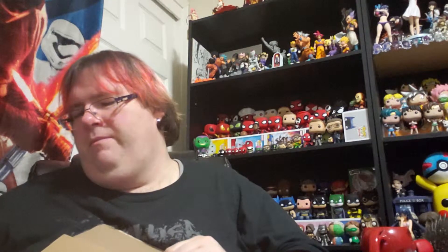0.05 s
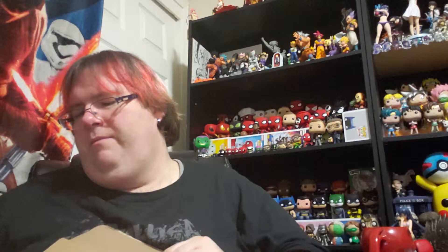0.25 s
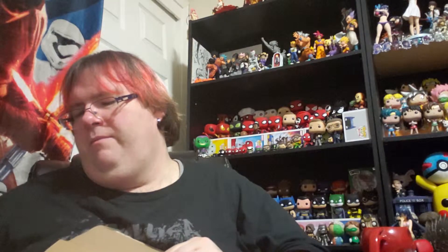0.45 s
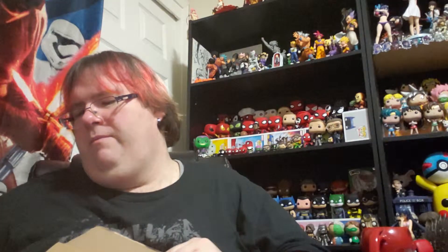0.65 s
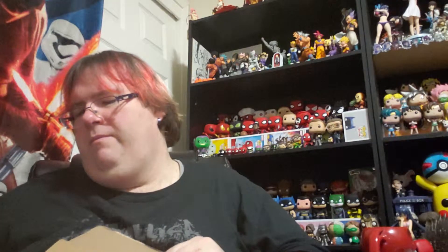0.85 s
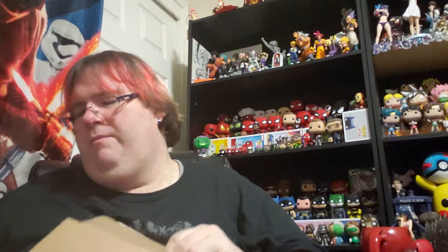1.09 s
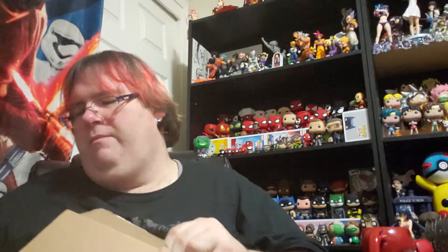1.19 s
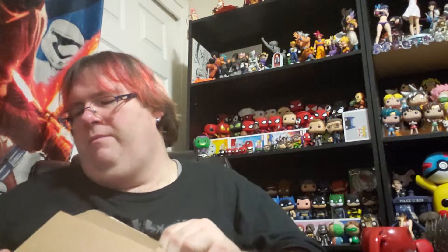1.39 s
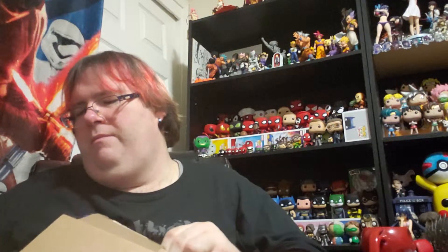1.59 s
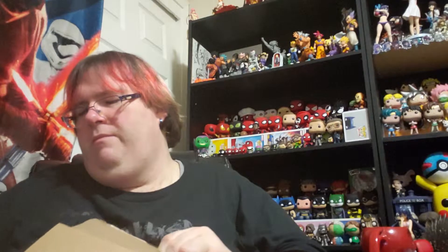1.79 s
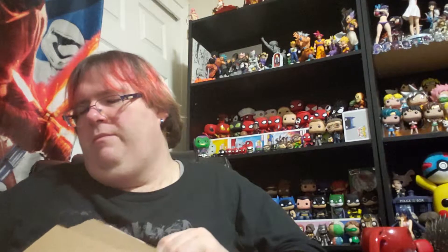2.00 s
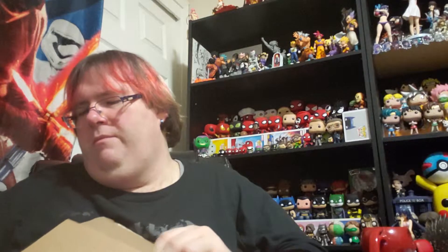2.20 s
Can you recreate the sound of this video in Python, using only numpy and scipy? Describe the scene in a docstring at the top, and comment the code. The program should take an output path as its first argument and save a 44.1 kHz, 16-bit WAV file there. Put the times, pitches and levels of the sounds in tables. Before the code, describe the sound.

Packing tape rips off a cardboard box in two quick, crackling pulls. The flaps slide and knock softly, then a last short tug brings a sharp knock and small tape snaps, close to the microphone in a small room.

```python
"""Packing tape ripped off a cardboard box, close to a stereo microphone in a small room.
After a few knocks and a slide come two quick pulls: the glue lets go in a stutter of slips
that crackle in the film and drum on the box. From one second in, the flaps slide and knock.
A last short tug at 1.6 s brings the hardest knock; then loose tape snaps among more slides
and knocks. A faint rumble and hum lie under it all."""
import sys
import numpy as np
from scipy import signal
from scipy.fft import rfft, irfft
from scipy.io import wavfile
from scipy.ndimage import uniform_filter1d

SR = 44100
rng = np.random.default_rng(int(sys.argv[2]) if len(sys.argv) > 2 else 0)


def int16_out(signal):
    """Quantize to a 16-bit WAV file."""
    q = np.round(np.clip(np.atleast_2d(signal).T, -1, 1) * 32767)
    wavfile.write(sys.argv[1], SR, q.astype(np.int16))


N = 99225

# Tugs on the tape. Each row: start and length in seconds, then crackle, fizz and box levels in dB.
TUGS = [(0.197, 0.016, -47, -57, -58), (0.219, 0.03, -35, -49.5, -41.5),
        (0.247, 0.017, -34.5, -54.5, -35.5), (0.266, 0.034, -30, -46, -40), (0.299, 0.016, -22, -33, -37),
        (0.321, 0.0075, -23.5, -50, -41), (0.349, 0.051, -53, -63, -53.5), (0.371, 0.0097, -27, -38.5, -37),
        (0.529, 0.1, -40, -48.5, -54.5), (.562, 0.012, -30, -35.5, -41), (0.582, 0.0095, -26, -38, -44.5),
        (0.603, 0.0037, -28.5, -33.5, -35), (0.608, 0.031, -27, -38.5, -40),
        (0.667, 0.0051, -27.5, -37.5, -36.5), (0.685, 0.0048, -23.5, -36, -47.5),
        (0.699, 0.0092, -28.5, -38.5, -40), (1.613, 0.015, -56, -42.5, -44),
        (1.627, 0.015, -38.5, -39, -45), (1.641, 0.0071, -34, -47.5, -41.5)]
# The glue lets go all at once. Each row: time in seconds, crack level in dB, box level in dB.
HARD_SLIPS = [(.236, -39, -16), (.307, -35, -17), (0.3126, -20, -13), (.377, -24.5, -20.5),
              (.590, -25, -12.5), (.609, -19.5, -18.5), (.629, -26, -11.5), (0.638, -17, -16.5),
              (.667, -37.5, -10), (.690, -19, -12.5), (.7005, -45, -12), (.7085, -24, -19.5)]
# Tone of the film's crackle and fizz, heard close. Each row: frequency in Hz, gain in dB.
CRACKLE_TONE = [(100, -26.5), (500, -12.5), (1000, -3.5), (1300, -4), (1800, 2), (2500, -2), (3800, -7),
                (5800, -12), (7500, -13), (10000, -17.5), (16000, -32.5)]
FIZZ_TONE = [(200, -1), (2000, -13.5), (5000, -10), (7500, 0.5), (11000, 3), (13000, -2.5), (16000, 0)]
SLIP_HZ, SLIP_JITTER, SLIP_DECAY_S = 200.3, 0.3, 0.0024
THREADS_PER_S, STEADY_PEEL = 16000, 0.45


def tape_peel():
    """Each slip jerks the box and snaps a burst of glue threads. Returns film sound and box force."""
    gaps = np.exp(SLIP_JITTER * rng.standard_normal(1200)) / SLIP_HZ
    slips = impulses(np.cumsum(gaps), np.ones(len(gaps)))
    bursts = STEADY_PEEL + fade(slips, SLIP_DECAY_S)
    coarse, fine = (even(bursts * grains(THREADS_PER_S, scatter_db=2), 0.036) for _ in range(2))
    levels = np.zeros((3, N))
    for start, length, *dbs in TUGS:
        rise = 0.22 * length
        levels += np.outer(undb(dbs), envelope(start - rise / 2, rise, length + rise / 2, 0.0019))
    crackle, fizz, push = levels
    times, crack_db, jerk_db = np.array(HARD_SLIPS).T
    cracks = fade(impulses(times, undb(crack_db)), SLIP_DECAY_S) * rng.choice([-1, 1], N)
    force = push * even(0.81 * unit(slips) + coarse, 0.0025) + impulses(times, undb(jerk_db))
    film, force = tension(crackle * coarse + cracks, force)
    return colour(film, CRACKLE_TONE) + colour(fizz * fine, FIZZ_TONE), force


# Resonances under tension. Each row: start in seconds, the film's pitch in Hz and level in dB,
# the box hollow's pitch in Hz and level in dB.
PULL_RESONANCES = [(.15, 2040, -24, 840, -9.5), (.5, 6000, -1, 650, -5), (.66, 5920, 1, 630, -4),
                   (1.55, 2030, 1, 496, -13)]
FILM_Q, HOLLOW_Q = 4.7, 4.9


def tension(film, force):
    """Tension makes the film and the hollow of the box ring at new pitches from pull to pull."""
    pull = np.searchsorted([row[0] for row in PULL_RESONANCES], np.arange(N) / SR) - 1
    film_ring, hollow_ring = np.zeros((2, N))
    for k, (_, film_hz, film_db, hollow_hz, hollow_db) in enumerate(PULL_RESONANCES):
        film_ring += undb(film_db) * resonate(film * (pull == k), film_hz, FILM_Q)
        hollow_ring += undb(hollow_db) * resonate(force * (pull == k), hollow_hz, HOLLOW_Q)
    return film + film_ring, force + hollow_ring


# Loose tape snapping near the microphone. Each row: time in seconds, relative level in dB.
SNAPS = [(.144, -40), (.378, -25), (.609, -10), (1.007, -51.5), (1.141, -44), (1.623, -20), (1.6455, -18),
         (1.648, -12), (1.8523, -25.5), (1.8593, -20), (1.8684, -20.5), (1.9467, -16.5)]
# Tone of a snap. Each row: frequency in Hz, gain in dB.
SNAP_TONE = [(200, -31), (4000, -26), (6000, -21), (8000, -18.5), (11200, -5), (13000, -7.5), (16000, -7)]


def tape_snaps():
    """Each snap is a brief crumple of film, thin and bright."""
    crumple = 0.51 * fade(hits(SNAPS), decay_s=0.00083) * rng.choice([-1, 1], N)
    return colour(crumple, SNAP_TONE)


# Hand and flap knocking on the box. Each row: time in seconds, level in dB.
KNOCKS = [(.019, -56), (.063, -36.5), (.136, -35), (.185, -32), (1.006, -31), (1.392, -46), (1.429, -45.5),
          (1.6135, -30), (1.6185, -20.5), (1.6235, -13.5), (1.824, -28), (1.8445, -22)]
# Tone of the damped cardboard. Each row: frequency in Hz, gain in dB.
BOARD_TONE = [(40, -47), (120, -4), (220, -1), (400, 9.5), (640, 13), (820, 10.5), (1200, -4), (2500, -9.5),
              (6000, -37.5), (16000, -43)]
# Modes of the box. Each row: frequency in Hz, relative level in dB, seconds to die away by 60 dB.
BOX_MODES = [(166.4, -3.5, 0.24), (265.5, 1, 0.13), (365.2, 0.5, 0.17), (501.6, 1, 0.2), (608.6, -1, 0.22),
             (677, -0.5, 0.17), (729.5, 0, 0.19), (752, -1.5, 0.13), (1615, -2.5, 0.1), (1765, -4, 0.14),
             (2044, -6, 0.12), (2460, -3.5, 0.25), (2590, 1.5, .1)]
RING_DB, BOX_LAG_S = -40.5, 0.00015


def box(rubbing):
    """Tugs, slides and knocks thud in the board; panels and hollow ring on, reaching the left first."""
    force = rubbing + hits(KNOCKS)
    t = np.arange(SR // 2) / SR
    ringing = []
    for lag in (0, BOX_LAG_S):
        modes = sum(undb(db) * np.sin(2 * np.pi * hz * (t - lag)) * np.exp(-np.log(1000) * t / t60)
                    for hz, db, t60 in BOX_MODES)
        ringing.append(ring(force, modes * (t >= lag)))
    thud = room(colour(force, BOARD_TONE), direct_db=2, lag_s=BOX_LAG_S)
    return thud + undb(RING_DB) * np.array(ringing)


# Cardboard sliding on cardboard. Each row: start, rise and length in seconds,
# then scrape, fizz and box levels in dB, then rasp pitch in Hz.
SLIDES = [(-.01, 0.02, 0.017, -69.5, -70.5, -61, 6800), (0.112, 0.085, 0.13, -66.5, -64.5, -61.5, 5950),
          (0.999, 0.0068, 0.028, -59.5, -91, -65, 3330), (1.031, 0.12, 0.23, -66, -69.5, -77.5, 1600),
          (1.239, 0.041, 0.096, -66.5, -70.5, -69.5, 1530), (1.339, 0.0067, 0.15, -73.5, -74.5, -81, 1620),
          (1.74, 0.019, 0.14, -68.5, -73.5, -72.5, 1660), (1.814, 0.024, 0.063, -57, -53, -70.5, 2590),
          (1.907, 0.038, 0.08, -62, -97, -66.5, 2600), (2.023, 0.0067, 0.045, -69, -66, -68.5, 5450),
          (2.187, 0.0017, 0.081, -57.5, -60, -67.5, 5240)]
# Tone of the scrape. Each row: frequency in Hz, gain in dB.
SCRAPE_TONE = [(100, 10.5), (800, -14), (1200, -15), (1650, -1), (2200, -5), (2700, -2.5), (3700, -16),
               (5000, -4.5), (7000, -3), (16000, -20)]
RASP_DB, RASP_Q = 4.5, 5


def flap_slides():
    """Paper fibres catch as a flap slides, rasping at one pitch. Returns surface sound and box force."""
    coarse, fine, drag = (even(grains(per_s=12000, scatter_db=0.78), 0.06) for _ in range(3))
    scrape, fizz = colour(coarse, SCRAPE_TONE), colour(fine, FIZZ_TONE)
    surface, force = np.zeros((2, N))
    for start, rise, length, scrape_db, fizz_db, box_db, rasp_hz in SLIDES:
        stroke = envelope(start, rise, length, release_s=0.017)
        rasp = undb(RASP_DB) * resonate(drag, rasp_hz, RASP_Q)
        surface += stroke * (undb(scrape_db) * (scrape + rasp) + undb(fizz_db) * fizz)
        force += stroke * undb(box_db) * drag
    return surface, force


# The box shifting. Each row: time in seconds, level in dB.
BUMPS = [(.32, -48), (.675, -52), (0.716, -53), (1.43, -61), (1.853, -53)]
# Tone of a dull bump. Each row: frequency in Hz, gain in dB.
BUMP_TONE = [(15, -67), (30, -35), (48, 18), (70, -8), (90, 8), (140, -34), (400, -55.5), (2000, -70)]
BUMP_WIDTH_S = 0.021


def box_bumps():
    """The whole box moves, giving short low swells."""
    t = np.arange(N) / SR
    swell = sum(undb(db) * np.exp(-0.5 * ((t - time) / BUMP_WIDTH_S) ** 2) for time, db in BUMPS)
    return swell * even(colour(rng.standard_normal(N), BUMP_TONE), 0.03)


BASS_T60_S, BASS_DB, TREBLE_T60_S, TREBLE_DB = 0.11, -1.5, 0.2, -0.5
WALL_DELAY_S, CROSSOVER_HZ, WANDER_HZ = 0.0034, 648, 4


def room(x, direct_db, lag_s=0.00004):
    """Direct sound, left side first, then the near walls' echoes, which shift as the hands move."""
    t = np.arange(SR // 2) / SR
    turn = 2 * np.pi * WANDER_HZ * np.arange(N) / SR

    def tail(t60, band):
        shape = np.clip(t / WALL_DELAY_S, 0, 1) ** 2 * np.exp(-np.log(1000) * t / t60)
        echoes = sum(ring(x * place, rng.standard_normal(len(t)) * shape)
                     for place in (np.cos(turn), np.sin(turn)))
        crossover = signal.butter(2, CROSSOVER_HZ, band, fs=SR, output="sos")
        return signal.sosfilt(crossover, echoes) / np.sqrt(np.sum(shape ** 2))
    direct = np.array([np.pad(x, (round(lag * SR), 0))[:N] for lag in (0, lag_s)])
    bass = tail(BASS_T60_S, "low")  # the same on both sides
    treble = np.array([tail(TREBLE_T60_S, "high") for _ in range(2)])
    return undb(direct_db) * direct + undb(BASS_DB) * bass + undb(TREBLE_DB) * treble


# Rumble of the room. Each row: frequency in Hz, gain in dB.
RUMBLE_TONE = [(15, -31), (30, -35), (55, 8.5), (110, 0.5), (200, -6.5), (400, -14), (800, -19.5),
               (2000, -31.5), (8000, -41)]
RUMBLE_DB, HUM_DB, HUM_HZ, HUM_WAVER_HZ = -70, -77, 165.4, 2


def room_tone():
    """A low rumble, nearly centred, and a faint wavering hum."""
    t = np.arange(N) / SR
    mid, side, waver = (unit(colour(rng.standard_normal(N), tone))
                        for tone in (RUMBLE_TONE, RUMBLE_TONE, BUMP_TONE))
    rumble = mid + 0.29 * side * np.array([[1], [-1]])
    hum = np.sqrt(2) * np.sin(2 * np.pi * (HUM_HZ * t + HUM_WAVER_HZ * np.cumsum(waver) / SR))
    return undb(RUMBLE_DB) * rumble + undb(HUM_DB) * hum


def undb(db):
    """Decibels to gain."""
    return 10 ** (np.asarray(db) / 20)


def unit(x):
    """Scale to rms 1."""
    return x / np.sqrt(np.mean(x ** 2))


def ring(x, response):
    """Play x through an impulse response."""
    return signal.fftconvolve(x, response)[:N]


def resonate(x, hz, q):
    """Play x through one resonance."""
    return signal.lfilter(*signal.iirpeak(hz, q, fs=SR), x)


def colour(x, points, column=1, size=4096):
    """Minimum-phase filter through (Hz, dB) points."""
    points = np.array(points, float)
    hz = np.maximum(np.fft.rfftfreq(size, 1 / SR), 1)
    gain = undb(np.interp(np.log(hz), np.log(points[:, 0]), points[:, column]))
    cepstrum = irfft(np.log(gain))
    cepstrum[1:size // 2] *= 2
    cepstrum[size // 2 + 1:] = 0
    return ring(x, irfft(np.exp(rfft(cepstrum))))


def impulses(times, sizes):
    """One click at each time."""
    out, at = np.zeros(N), np.round(np.asarray(times) * SR).astype(int)
    inside = (at >= 0) & (at < N)
    np.add.at(out, at[inside], np.asarray(sizes)[inside])
    return out


def hits(table):
    """Clicks from (s, dB) rows."""
    times, dbs = np.array(table).T
    return impulses(times, undb(dbs))


def envelope(start, rise, length, release_s):
    """Rise, hold until the length is over, die away."""
    t = np.arange(N) / SR - start
    return np.clip(t / rise, 0, 1) * np.exp(-np.maximum(t - length, 0) / release_s)


def fade(clicks, decay_s):
    """Give each click a dying tail."""
    return signal.lfilter([1], [1, -np.exp(-1 / (decay_s * SR))], clicks)


def even(x, span_s):
    """Hold the short-term rms near 1, keeping the grain."""
    span = max(int(span_s * SR), 2)
    return x / np.sqrt(uniform_filter1d(uniform_filter1d(x ** 2, span), span) + 1e-9)


def grains(per_s, scatter_db):
    """Dense tiny clicks of uneven size."""
    clicks = (rng.random(N) < per_s / SR) * rng.choice([-1, 1], N)
    return clicks * undb(scatter_db * rng.standard_normal(N))


def scene():
    """Tape and flaps drive the one box, close to the microphone in the small room."""
    film, pull = tape_peel()
    surface, drag = flap_slides()
    return (room(film + surface, direct_db=-2) + room(tape_snaps(), direct_db=5.5)
            + box(pull + drag) + box_bumps() + room_tone())


# The stereo microphone's two ports. Each row: frequency in Hz, left and right gain in dB,
# left and right relative hiss in dB.
MIC_PORTS = [(103, 1.5, -4.5, -19.5, -16), (298.5, 6.5, 2, -15, -13), (578, 0.5, -2, -8.5, -11),
             (990, 6, 0.5, -11.5, -19), (2500, 3.5, -7, -14.5, -17.5), (4760, 6.5, 1, -15.5, -20.5),
             (6070, 10.5, -5, -9, -34), (7530, 1, -1.5, 3, -23), (8180, -2.5, -11.5, -13, -25),
             (10250, -12, 8, -25, -21.5), (11660, -9.5, 11, -12, -6), (12400, -15.5, 8.5, -25, -9.5),
             (15800, -11.5, 3, -12, -23)]
HISS_DB, LOW_CUT_HZ, HIGH_CUT_HZ = -58, 68, 15850


def record(dry):
    """Each microphone port has its own resonances and hiss; the deepest bass and the top are cut."""
    sound = np.array([colour(dry[c], MIC_PORTS, column=1 + c) for c in range(2)])
    hiss = np.array([colour(rng.standard_normal(N), MIC_PORTS, column=3 + c) for c in range(2)])
    low_cut = signal.butter(2, LOW_CUT_HZ, "high", fs=SR, output="sos")
    high_cut = signal.ellip(10, 0.2, 70, HIGH_CUT_HZ, fs=SR, output="sos")
    return signal.sosfilt(high_cut, signal.sosfilt(low_cut, sound + undb(HISS_DB) * hiss))


dry = scene()
out = record(dry)
int16_out(out)
```